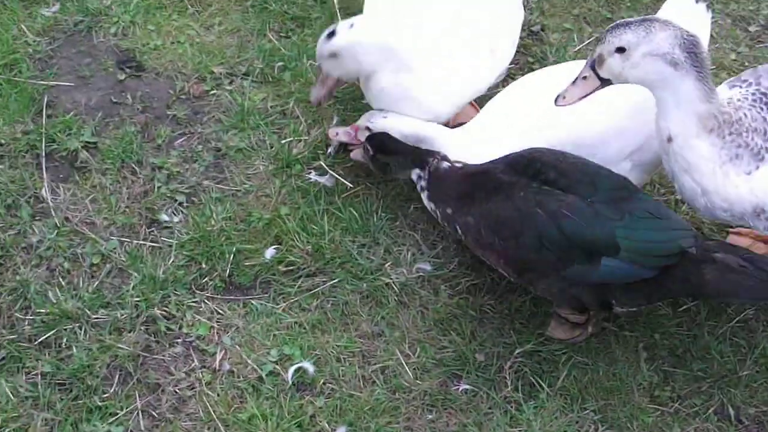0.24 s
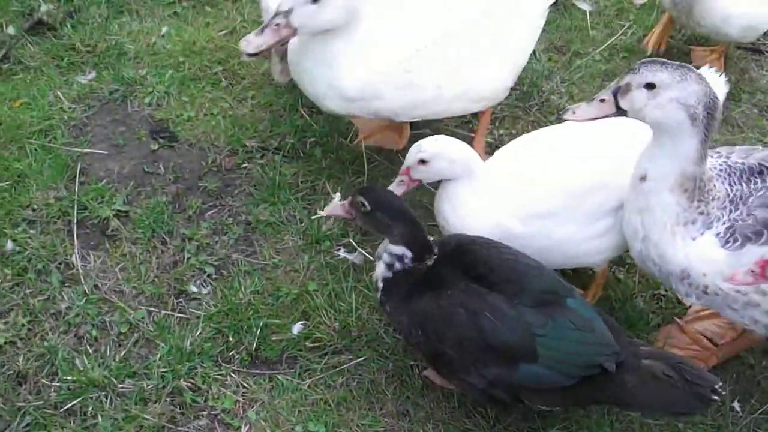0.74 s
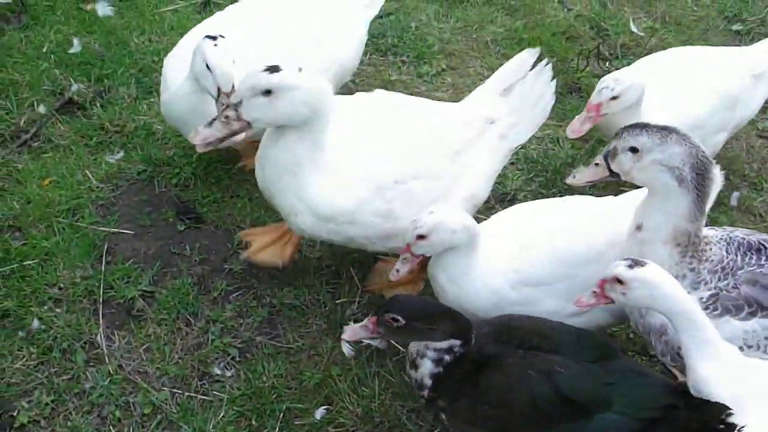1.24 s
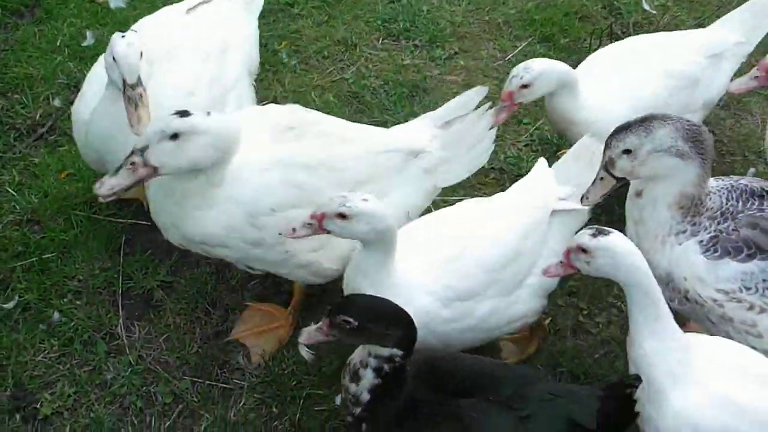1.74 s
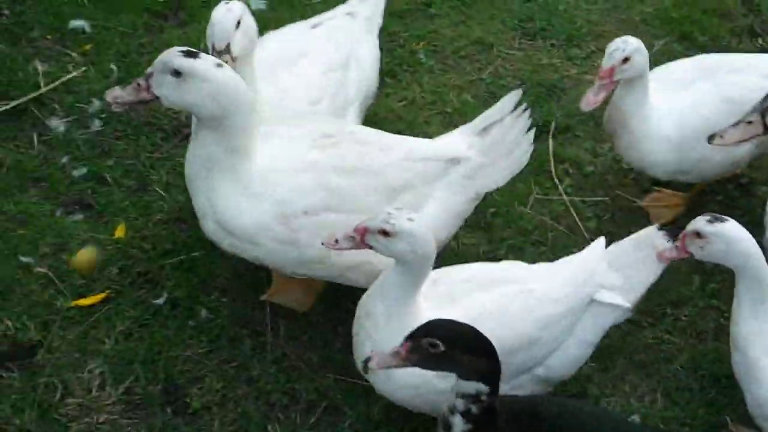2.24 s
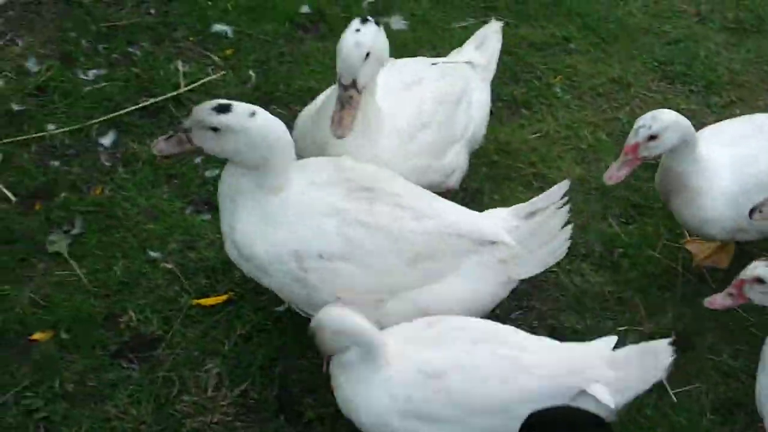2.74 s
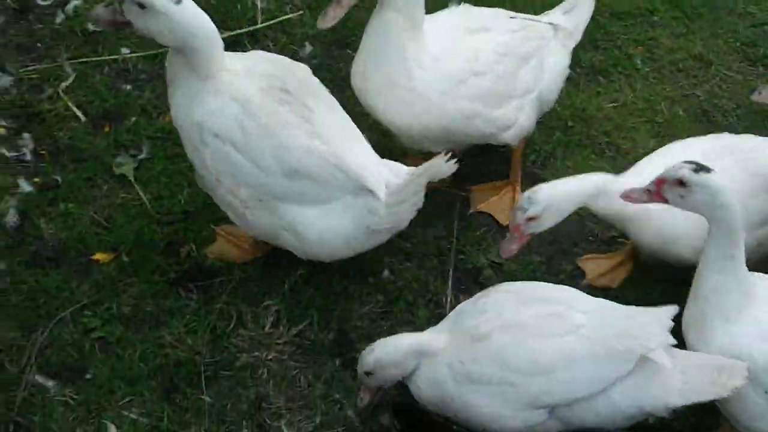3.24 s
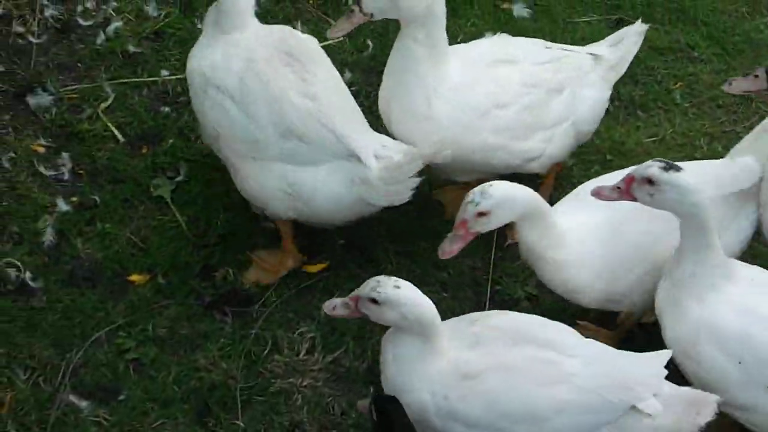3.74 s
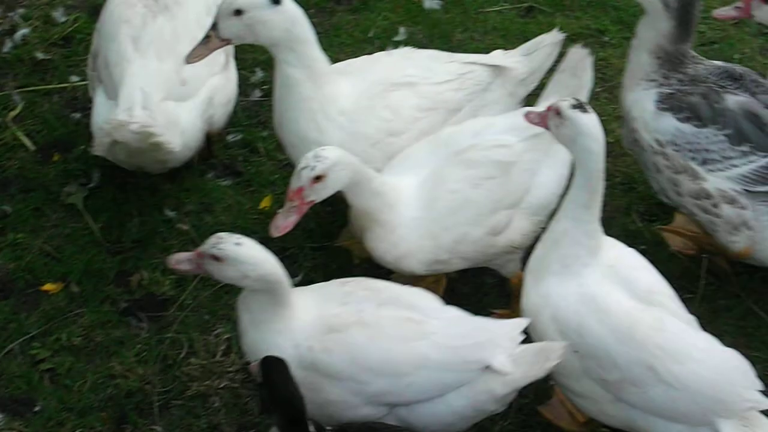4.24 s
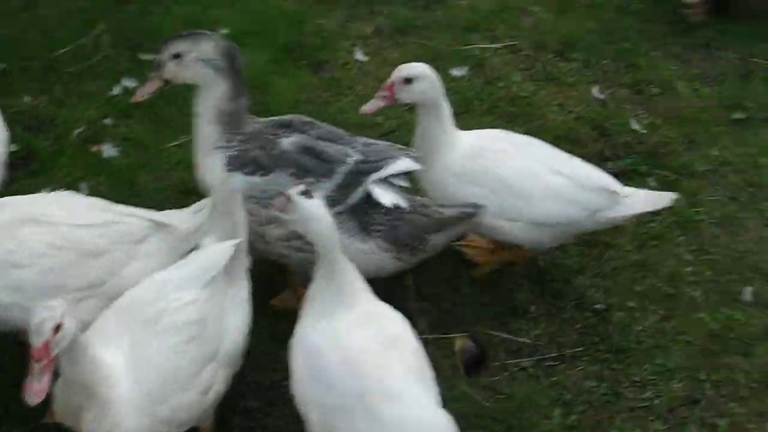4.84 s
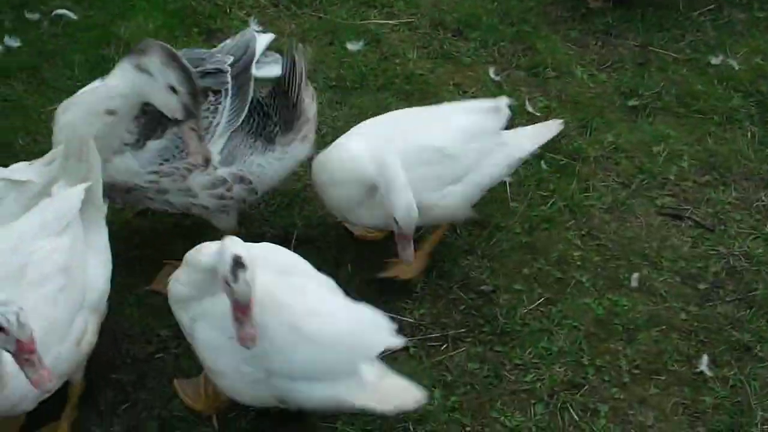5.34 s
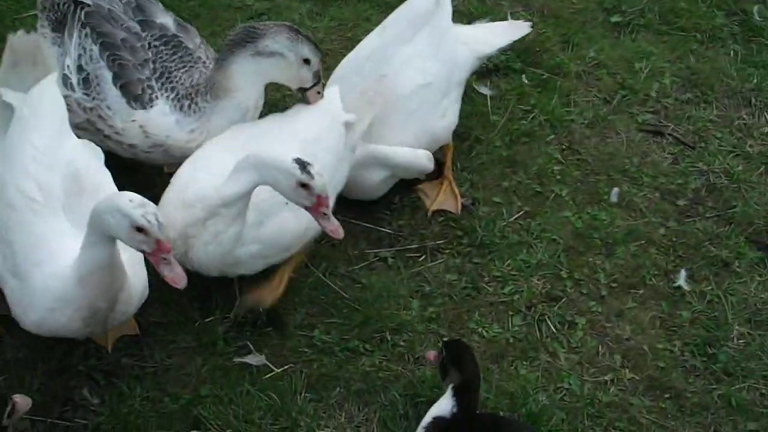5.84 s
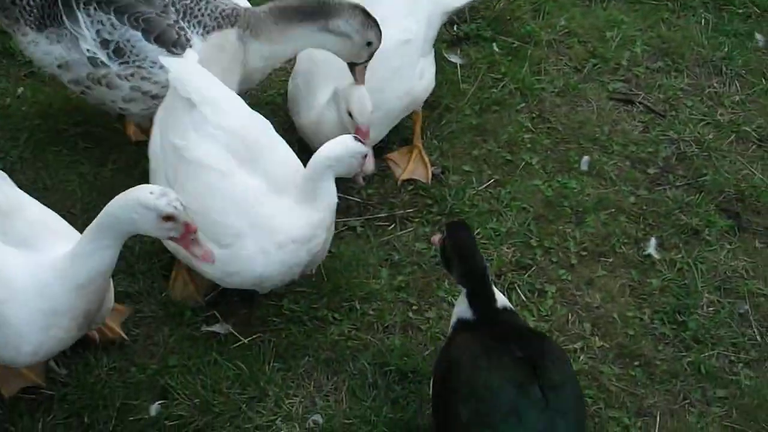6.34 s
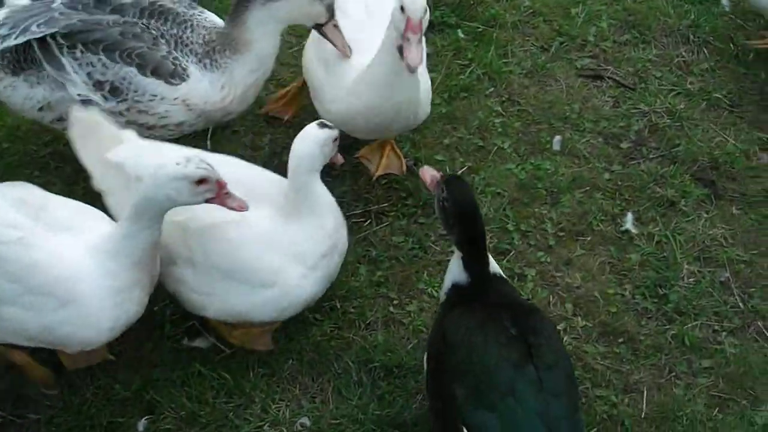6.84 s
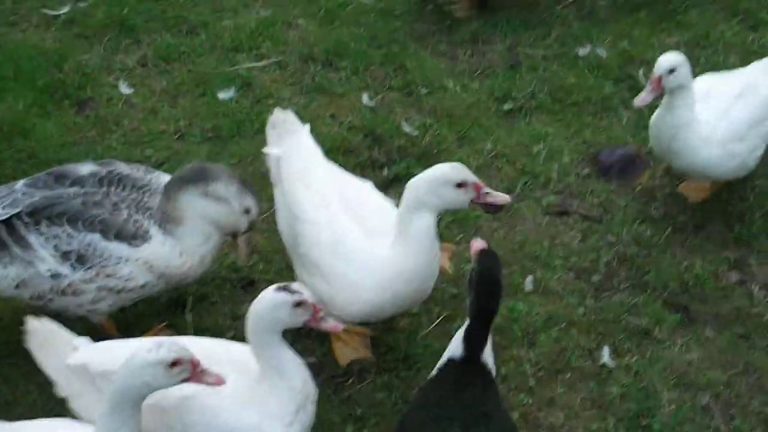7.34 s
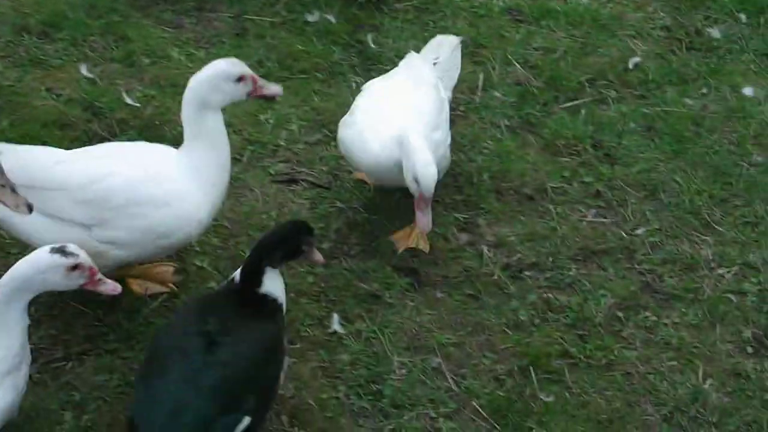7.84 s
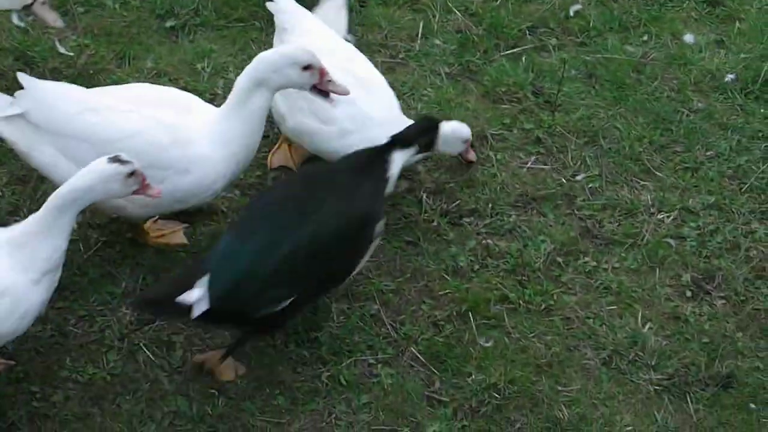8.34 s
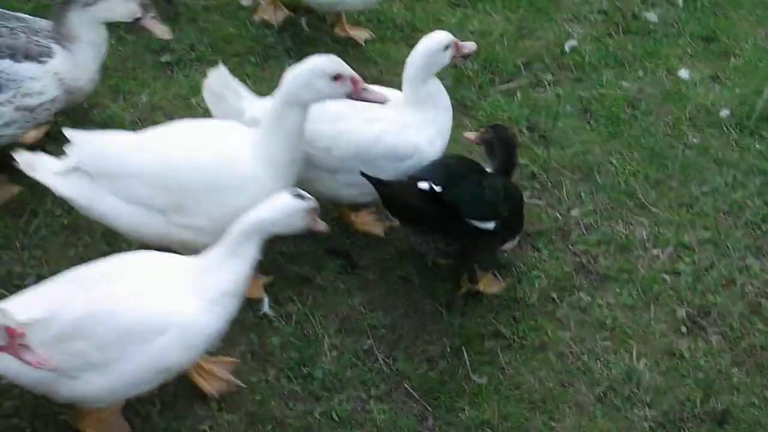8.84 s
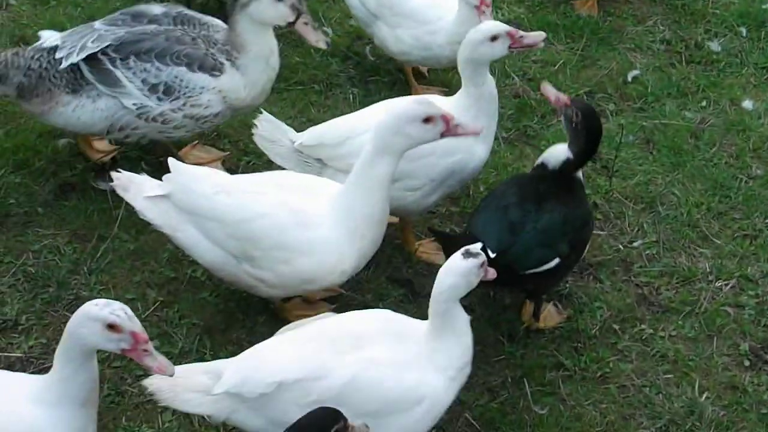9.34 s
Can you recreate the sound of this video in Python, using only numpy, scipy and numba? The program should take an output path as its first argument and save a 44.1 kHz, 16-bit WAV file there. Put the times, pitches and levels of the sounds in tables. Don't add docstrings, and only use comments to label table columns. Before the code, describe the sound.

Ducks feed very close to a handheld microphone on an open lawn, over low distant traffic, a wavering engine drone and a faint high insect hiss with short katydid scrapes about every 0.7 seconds. From 0 to 1 s come a chirp, bill snips, three clipped croaks and a clear peep. Rising chirps and dull pops follow, then peeps near 1.7 s and, at 1.95 s, a violent hard snap that clips and briefly ducks the sound. Between 2.4 and 3.1 s grunts, chirps and clicks crowd together. It is sparse until chirps and small croaks at 4.3-4.8 s; feathers rustle around 5.4 s with a soft long croak, and a peep lifts at 5.7 s. Quiet grunts come at 6.5 s, then ticks and small peeps. A lively cluster of snips, chirps and thin warbling runs 7.4-8.1 s, three rough croaks at 8.3-8.5 s, then faint peeps and clicks to about 9.5 s as the engine nearly disappears.

```python
import sys
import numpy as np
from scipy import signal
from scipy.fft import rfft, irfft, next_fast_len
from scipy.io import wavfile
from scipy.ndimage import uniform_filter1d
from numba import njit

SR = 44100
rng = np.random.default_rng(int(sys.argv[2]) if len(sys.argv) > 2 else 0)


def store_pcm(level_fs):
    pcm = np.round(np.clip(level_fs, -1, 1) * 32767).astype(np.int16)
    wavfile.write(sys.argv[1], SR, np.atleast_2d(pcm).T)


def convert_level_to_amplitude(level_db):
    exponent = np.asarray(level_db, float) / 20
    return 10 ** exponent


N = 422478

# start_s, traffic_db, rustle_db (feet and feathers)
YARD_LEVELS = [
    (0.0, -47.5, -56.5),
    (1.84, -49, -58.5),
    (4.96, -51, -59.5),
    (5.28, -50, -57),
    (5.4, -49.5, -53),
    (5.75, -50.5, -58),
    (7.12, -50.5, -59),
    (7.82, -49.5, -57.5),
    (8.94, -52, -59),
    (9.58, -50.5, -60),
]


def level(x, db):
    return x * convert_level_to_amplitude(db) / np.sqrt(np.mean(x ** 2))


def band(x, hz, width_hz):
    return signal.lfilter(*signal.iirpeak(hz, hz / width_hz, SR), x)


def add(out, s, x):
    i = int(s * SR)
    out[i:i + len(x)] += x[:N - i]


def walk(rate):
    k = int(SR / rate)
    steps = np.repeat(rng.standard_normal(N // k + 1), k)
    return 1.31 * uniform_filter1d(uniform_filter1d(steps, k), k)[:N]


def curve(table, column):
    return np.interp(np.arange(N) / SR, [r[0] for r in table], [r[column] for r in table])


def wash(spectrum, flicker_db, rate):
    hz, db = np.transpose(spectrum)
    size = next_fast_len(N, True)
    octave = np.log2(np.arange(1, size // 2 + 2) * SR / size)
    colour = rfft(rng.standard_normal(size)) * convert_level_to_amplitude(np.interp(octave, np.log2(hz), db, -99, -99))
    out = 0
    for k in np.arange(np.floor(2 * np.log2(hz[0])), 2 * np.log2(hz[-1]) + 1):
        piece = irfft(colour * np.clip(1 - abs(2 * octave - k), 0, 1), size)[:N]
        out = out + convert_level_to_amplitude(flicker_db * walk(rate)) * piece
    return level(out, 0)


def traffic():
    # freq_hz, density_db (per Hz)
    traffic_colour = [(18, -0.5), (25, -8), (36, -9), (100, -13), (200, -18.5), (340, -22.5), (560, -19),
                      (950, -20.5), (1150, -24), (1400, -32), (2200, -42.5), (2900, -47)]
    return convert_level_to_amplitude(curve(YARD_LEVELS, 1) + 4) * wash(traffic_colour, 2.0, 12)


def rustle():
    # freq_hz, density_db (per Hz)
    rustle_colour = [(1200, -12), (1600, -5), (2240, -7), (2900, 0.5), (3600, -4.5), (4700, -1),
                     (5600, -4.5), (7000, -3), (8500, -16), (11000, -23)]
    sizes = convert_level_to_amplitude(2.1 * np.minimum(rng.exponential(size=N), 2)) * rng.standard_normal(N)
    crackle = (rng.random(N) < 60 / SR) * sizes
    grass = wash(rustle_colour, 1.9, 20) + level(band(crackle, 11000, 14000), -10.0)
    return convert_level_to_amplitude(curve(YARD_LEVELS, 2) + 1.5) * grass


def haze():
    # freq_hz, density_db (per Hz)
    haze_colour = [(5500, -46), (7500, -8), (8800, -8.5), (9900, -3.5), (11200, 2.5), (12500, -4.5),
                   (14000, -10), (15000, -10), (15900, -14)]
    return convert_level_to_amplitude(-53 + 1.0 * walk(9)) * wash(haze_colour, .7, 20)


def engine():
    # start_s, firing_hz, level_db
    drone = [
        (0.0, 76.1, -49),
        (0.9, 75.5, -49),
        (1.25, 75, -41),
        (2.0, 72, -49.5),
        (2.7, 72, -43),
        (3.9, 69, -48.5),
        (5.0, 68.9, -48),
        (6.2, 65, -47.5),
        (7.6, 62.07, -54),
        (9.58, 61, -55),
    ]
    phase = 2 * np.pi * np.cumsum(curve(drone, 1) * (1 + 0.022 * walk(6))) / SR
    return np.sqrt(2) * convert_level_to_amplitude(curve(drone, 2) - 2.0 + 1.8 * walk(12)) * np.sin(phase)


def crickets():
    # wing_hz, strokes_per_s, open_share (0-1), bend_rad, unsteadiness, level_db
    singers = [(9524, 36.2, 1, 1.5, 0.0065, -62)]
    out, t = np.zeros(N), np.arange(N) / SR
    for hz, rate, share, bend, drift, db in singers:
        cycle = t * rate + drift * walk(2.0)
        stroke = np.sin(np.pi * np.clip(cycle % 1 / share, 0, 1))
        stroke_bend = bend * np.cos(2 * np.pi * (cycle - share / 2))
        note = np.sin(2 * np.pi * hz * t + stroke_bend + 8 * drift * walk(60) + .5 * walk(3.7))
        swell = convert_level_to_amplitude(5.3 * drift * walk(2.22) + .8 * walk(5))
        out += level(stroke * swell * note, db)
    return out


def hoarse_singers():
    # wing_hz, width_hz, bursts_per_s, level_db
    pair = [(7720, 260, 20.3, -68.5), (7620, 300, 21.4, -71.5)]
    out, t = np.zeros(N), np.arange(N) / SR
    for hz, width_hz, rate, db in pair:
        wing = band(band(rng.standard_normal(N), hz, width_hz), hz, width_hz)
        burst = np.clip(np.sin(2 * np.pi * (rate * t + .3 * walk(1.5))) + .2, 0, 1)
        out += level(burst * convert_level_to_amplitude(3.5 * walk(2.5)) * wing, db)
    return out


def strikes(rows, t60_s, width_share, gain_db):
    out, t = np.zeros(N), np.arange(int(0.038 * SR)) / SR
    for s, db, hz in rows:
        edge_db = -6 - .7 * (db + 39)
        noise = rng.standard_normal((2, len(t)))
        ring = band(noise[0] * np.exp(-np.log(1000) * t / t60_s), hz, width_share * hz)
        edge = np.diff(noise[1] * np.exp(-t / .0012), 2, append=[0, 0])
        strike = ring / abs(ring).max() + convert_level_to_amplitude(edge_db) * edge / abs(edge).max()
        add(out, s, convert_level_to_amplitude(db + gain_db) * strike)
    return out


def snips():
    # start_s, peak_db, ring_hz
    stalks = [(0.0924, -39, 9000), (0.5874, -35, 12500), (1.634, -41, 6590), (1.7868, -44, 10000),
              (2.1784, -39.5, 7810), (0.044, -45, 9000), (0.42, -41, 5500), (1.3134, -41, 12000),
              (2.1051, -43, 12000), (2.4778, -46, 12000), (4.563, -46, 13000), (4.742, -43, 5200),
              (4.885, -45, 4800), (6.866, -48, 12200), (6.888, -40, 12000), (7.0903, -40, 12000),
              (7.118, -44, 5500), (7.333, -47, 4500), (7.677, -37.5, 5500), (7.7104, -33, 5500),
              (2.581, -41, 3500), (2.589, -40, 5000), (7.885, -44, 5600), (8.45, -46, 12500),
              (8.3, -42, 5500), (4.0594, -45.5, 6160), (5.328, -44, 5000), (5.4999, -43, 5640),
              (6.4283, -43, 12500), (6.6634, -40.5, 12000), (6.734, -38, 4500), (7.262, -42, 7690),
              (7.1681, -42, 13000), (7.2946, -40, 6000), (7.818, -38, 12500), (8.531, -36, 9500),
              (9.2021, -39, 6040), (9.4968, -49.5, 6180)]
    return strikes(stalks, t60_s=0.011, width_share=.6, gain_db=4.8)


def chirps(flutter_hz=175, smooth_hz=950, wobble=0.075, chest_db=-10, bill_db=-4, tick_db=-24, arch=0.073):
    # start_s, length_s, peak_db, start_hz, end_hz
    rises = [(0.045, 0.02, -28, 630, 851.6), (1.004, 0.031, -29.5, 658.9, 814),
             (1.105, 0.041, -32.5, 694.9, 1153), (1.217, 0.022, -30, 692, 997.8),
             (1.464, 0.021, -29, 717, 785), (2.468, 0.03327, -33, 790, 940),
             (2.515, 0.013, -39.5, 910, 570), (2.583, 0.029, -30.5, 683, 1120),
             (4.431, 0.025, -31, 517, 967.7), (4.532, 0.026, -32.5, 587.4, 797),
             (4.645, 0.023, -39, 550, 800), (4.756, 0.024, -37, 540, 760), (5.808, 0.0338, -34, 464, 1094),
             (5.929, 0.021, -31.5, 446, 857), (7.671, 0.019, -25, 512, 1073),
             (7.779, 0.03681, -30.5, 560, 1180), (7.887, 0.039, -29, 620, 1197),
             (7.929, 0.027, -34, 963, 1110), (7.969, 0.01418, -43, 834, 1080)]
    # start_s, length_s, peak_db, pitch_hz
    peeps = [(0.751, 0.034, -25, 1059), (1.693, 0.034, -22.5, 1000), (1.663, 0.009, -32, 1020),
             (1.673, 0.008, -31, 1150), (1.681, 0.007, -31, 1170), (1.687, 0.007, -30, 1150),
             (9.475, 0.02, -42, 920), (9.44, 0.018, -44, 1250), (9.4, 0.03, -45, 600),
             (7.58, 0.014, -38, 950), (9.035, 0.014, -42, 700), (4.79, 0.04, -44, 560),
             (1.902, 0.0072, -36.5, 1060), (1.932, 0.022, -37, 850), (7.9, 0.02, -36, 1150),
             (4.461, 0.018, -39.5, 990), (6.189, 0.032, -39.5, 1000), (6.274, 0.012, -40, 882.3),
             (6.691, 0.023, -35, 1025), (6.81, 0.00729, -34, 950), (6.921, 0.024, -46, 1080),
             (7.259, 0.015, -35.5, 1060), (7.865, 0.025, -32.5, 934), (8.086, 0.011, -37, 902.8)]
    # start_s, length_s, peak_db, pitch_hz
    lifts = [(2.797, 0.018, -36.5, 790), (1.283, 0.024, -41, 1025), (9.515, 0.035, -43, 800),
             (7.385, 0.02, -45, 1000), (7.475, 0.02, -43, 850), (7.305, 0.015, -43, 850),
             (2.691, 0.014, -38, 840), (2.738, 0.024, -32.5, 957), (4.312, 0.038307, -35.5, 666),
             (5.693, 0.036, -26, 714.8), (6.222, 0.031, -36, 1005), (6.886, 0.015, -45, 1160),
             (7.171, 0.022, -44, 1052), (7.216, 0.021, -40, 987), (7.428, 0.018, -40, 900),
             (7.687, 0.024, -31, 945), (8.83, 0.017, -41.5, 950)]

    def sliding(rows, hz_per_s, peak):
        return [(s, d, db, hz - hz_per_s * d / 2, hz + hz_per_s * d / 2, peak) for s, d, db, hz in rows]

    notes = [(*row, 0.093) for row in rises] + sliding(peeps, -2100, 0.3058) + sliding(lifts, 6400, 0.43)
    out, knots = np.zeros(N), np.linspace(0, 1, 12)
    for s, length, db, start_hz, end_hz, peak in notes:
        u = np.linspace(0, 1, int(1.106 * length * SR))
        turn, slip = rng.random(2), rng.standard_normal((2, 12))
        glide = start_hz + (end_hz - start_hz) * u + arch * start_hz * (np.sin(np.pi * u) - .6)
        strain = np.clip(abs(end_hz - start_hz) / 150, .3, 1)
        hz = glide * (1 + strain * wobble * np.interp(u, knots, slip[0]))
        shape = np.sin(np.pi / 2 * np.interp(u, [0, np.clip(peak, .03, .9), 1], [0, 1, 0])) ** 1.15
        depth = np.clip((smooth_hz - glide) / 300, .45 * strain, .95)
        beat = 1.3 * length * flutter_hz * (.85 + 0.31 * turn[0]) * u
        pulse = np.sin(np.pi * (beat % 1) ** 0.82)
        phase = 2 * np.pi * (np.cumsum(hz) / SR + turn[1])
        slap = depth * np.exp(-(beat % 1) / 0.21)
        tick = band(band(slap * rng.standard_normal(len(u)), 4700, 700), 4600, 1400) / 0.12
        bill = convert_level_to_amplitude(bill_db) * slap * np.sin(1.55 * phase)
        wave = np.sin(phase) + bill + convert_level_to_amplitude(-33.5) * np.sin(3 * phase) + convert_level_to_amplitude(tick_db) * tick
        rough = 1 + .45 * strain * np.interp(u, knots, slip[1])
        chest = convert_level_to_amplitude(chest_db) * depth * np.sin(2 * np.pi * beat)
        add(out, s, convert_level_to_amplitude(db) * shape * ((1 - depth + depth * pulse) * rough * wave + chest))
    return out


def katydids(tooth_hz=290):
    # start_s, peak_db
    phrases = [(0.29, -47), (0.946, -49.5), (1.621, -48), (2.2598, -50.5), (2.952, -48.5), (3.5596, -54.5),
               (4.2547, -52.5), (5.1592, -52), (6.056, -46), (6.713, -44.5), (7.422, -43), (8.036, -44),
               (8.768, -45), (9.4078, -46)]
    # start_s, peak_db, length_s, wing_pitch_ratio
    neighbour = [
        (4.8, -51, 0.1, 1.12),
    ]
    # freq_hz, width_hz, gain_db
    wing_bands = [(6140, 240, 3.5), (6520, 330, 2.5), (7000, 280, -3.5)]
    out = np.zeros(N)
    for s, db, length, size in [*[(s, db, 0.15, 1) for s, db in phrases], *neighbour]:
        u = np.linspace(0, 1, int(length * SR))
        scrape = rng.standard_normal(len(u)) * np.exp(-(u * length * tooth_hz % 1) / .5)
        song = 0
        for hz, width_hz, gain_db in wing_bands:
            song = song + convert_level_to_amplitude(gain_db) * band(band(scrape, size * hz, width_hz), size * hz, 2 * width_hz)
        swell = np.sin(np.pi * u ** 0.9373) ** .5
        notch = 1 - 0.36 * np.exp(-((u - .5) / 0.08874) ** 2)
        add(out, s - .01, level(song, db - 4.5) * swell * notch)
    return out


def slides(rough_db=3.5, wobble=.014):
    # start_s, length_s, peak_db, start_hz, end_hz
    tones = [(0.311, 0.047, -53, 4350, 4950), (0.313, 0.025, -54, 2600, 3532),
             (2.003, 0.05, -51, 2849, 3809), (2.02, 0.037, -59, 4300, 4800),
             (3.045, 0.039, -54, 2700, 3850), (3.054, 0.02744, -48.5, 4200, 4755),
             (5.021, 0.05, -51.5, 2850, 4055), (5.026, 0.04, -53.5, 4373, 4858),
             (5.08, 0.035, -54.5, 4710, 4900), (5.342, 0.018, -52, 1350, 2300),
             (7.76, 0.022, -53, 2370, 2800), (7.782, 0.018, -52, 2100, 3000), (7.8, 0.04, -53, 2750, 2300),
             (8.098, 0.038, -57, 4500, 4400), (0.89, 0.09334, -60, 3150, 3277)]
    out = np.zeros(N)
    for s, length, db, start_hz, end_hz in tones:
        u = np.linspace(0, 1, int(length * SR))
        slip = [np.interp(u, np.linspace(0, 1, 12), row) for row in rng.standard_normal((2, 12))]
        glide = np.sin(np.pi / 2 * np.clip(1.15 * u ** 1.5, 0, 1)) ** 2
        pitch = (start_hz + (end_hz - start_hz) * glide) * (1 + wobble * slip[0])
        tone = np.sin(2 * np.pi * np.cumsum(pitch) / SR)
        add(out, s, convert_level_to_amplitude(db + 1.0 + rough_db * slip[1]) * np.sin(np.pi * u) ** 0.6 * tone)
    return out


def bill_clicks():
    # start_s, peak_db, ring_hz
    contacts = [(1.3208, -33.5, 2930), (1.5798, -43, 3010), (1.704, -33, 2900), (1.699, -32, 4300),
                (1.704, -36, 5600), (2.674, -42, 2750), (7.444, -42, 1600), (2.107, -41, 2900),
                (2.4822, -37, 4320), (2.588, -38, 2292), (4.3844, -42, 4680), (4.4497, -39, 4620),
                (4.54, -40.5, 4680), (4.625, -41, 4650), (3.2094, -42, 4800), (0.546, -44, 2600),
                (8.394, -47, 2900), (5.1693, -32, 1472), (5.545, -40.5, 2900), (7.091, -37, 4447),
                (7.559, -37, 1510), (7.643, -43.5, 3010), (7.676, -34, 2859), (7.7095, -31, 4915),
                (7.7754, -40, 2650), (8.6494, -45, 4480), (9.165, -40, 3000)]
    return strikes(contacts, t60_s=0.031, width_share=.13, gain_db=0)


def grunts(jitter=.03, bill_hz=1060, chest_db=-4, rebound=0.18, rebound_s=0.00328, top_hz=1600):
    # start_s, length_s, level_db, pulse_hz, throat_hz
    croaks = [(0.566, 0.043, -29, 106, 690), (0.669, 0.033, -27, 119, 630),
              (0.7603, 0.031, -27.5, 124.6, 600), (2.57, 0.031, -34.5, 96.8, 740),
              (2.716, 0.024, -37, 121.5, 654.1), (2.762, 0.036, -28, 116, 487),
              (2.888, 0.026, -29, 148.5, 584), (2.996, 0.021, -32, 180.6, 659.7),
              (3.089, 0.03423, -27, 131.5, 494), (4.421, 0.013, -32.5, 159.2, 630),
              (4.618, 0.019, -36.5, 143, 480.1), (5.377, 0.062, -36, 100.8, 704),
              (6.516, 0.024, -34.5, 165, 875.2), (6.634, 0.019, -31.5, 154.5, 861.1),
              (7.561, 0.034, -39, 155, 485.9), (8.324, 0.048, -30, 104, 680),
              (8.421, 0.035, -29.5, 138.3, 514), (8.531, 0.033, -26, 140.4, 880)]
    # start_s, level_db, throat_hz
    pops = [
        (0.548, -39.5, 870),
        (0.7143, -32, 560),
        (1.429, -30.5, 611.6),
        (1.655, -26.5, 579.3),
        (2.458, -37.5, 545),
        (2.676, -40, 525.8),
        (3.277, -45, 500),
        (5.168, -38.5, 590),
        (7.445, -41, 454.4),
    ]
    # start_s, rasp_db
    facing = [
        (0.57, 0),
        (0.77, -1),
        (2.77, -0.5),
        (3.0, -2),
        (3.1, 2),
        (4.5, -4),
        (5.4, -12),
        (6.6, -3),
        (8.33, -5.5),
        (8.53, -1),
    ]
    # freq_hz, width_hz, gain_db
    rasp_bands = [(1440, 170, -6), (2600, 820, 2.5), (4270, 380, 8.5), (4850, 570, 6.5), (9000, 5720, -14)]
    out = np.zeros(N)
    for s, length, db, rate_hz, throat_hz in [*croaks, *[(s, 0.0059, db, 217, hz) for s, db, hz in pops]]:
        lone_pulse = length < .009
        rasp_db = -15.5 - 0.1019 * (rate_hz - 125) + np.interp(s, *np.transpose(facing))
        chance = rng.standard_normal((12, 2))
        gaps = (1 + jitter * chance[1:, 0]) * .95 ** np.arange(-1, 10) / rate_hz
        times = np.cumsum(np.r_[0, gaps])
        on = times < max(length - .006, .001)
        pulses = np.zeros(int(.09 * SR))
        arc = np.sin(np.pi * (times[on] + 0.012) / (length + 0.014))
        pulses[(times[on] * SR).astype(int)] = convert_level_to_amplitude(2.2 * chance[on, 1]) * arc
        puffs = signal.lfilter([1], [1, -np.exp(-1 / (0.002 * SR))], pulses)
        air = puffs * rng.standard_normal((2, len(pulses)))
        flow = np.roll(pulses, 20) + rebound * np.roll(pulses, int(rebound_s * SR)) + 0.13 * air[0]
        flow = np.convolve(flow, np.hanning(int(.0007 * SR)))[:len(pulses)]
        t = np.arange(len(flow)) / SR
        shut_db = 192 * np.clip(t - length / 2, -.02, .02)
        bill = convert_level_to_amplitude(-9.5 - 5.5 * lone_pulse - shut_db) * band(flow, bill_hz, 180.0)
        bill = bill + convert_level_to_amplitude(-24.0 - shut_db) * band(flow, 1.43 * bill_hz, 220)
        low = convert_level_to_amplitude(-9.5 + shut_db) * band(flow, 150 + 0.42 * throat_hz, 124)
        voice = band(flow, throat_hz, 85) - bill - low
        voice = -signal.sosfilt(signal.butter(4, top_hz, fs=SR, output="sos"), voice)
        chest_hz = 90 + rate_hz / 2
        chest = convert_level_to_amplitude(.4 * shut_db) * band(band(pulses, chest_hz, 125), chest_hz, 125)
        leak = (air[1] + 3 * pulses) * np.clip(t / 0.01, .3, 1)
        rasp = 0
        for hz, width_hz, gain_db in rasp_bands:
            rasp = rasp + convert_level_to_amplitude(gain_db) * band(band(leak, hz, width_hz), hz, 2 * width_hz)
        short_db = db + 10 * np.log10((length + 0.0067) / 0.082) - 3
        croak = level(voice, short_db) + level(chest, short_db + chest_db - 6 * lone_pulse)
        add(out, s - .001, croak + level(rasp, short_db + rasp_db - 4))
    return out


def snap():
    # start_s, level_db, thump_db
    blows = [
        (1.9524, 0, -13),
        (1.9557, 2.5, 4.5),
        (1.9582, -1, 4),
        (1.9674, -17, -20),
    ]
    # freq_hz, gain_db, t60_s
    modes = [(560, -8, 0.041), (1110, -1.5, .018), (1540, -1.5, 0.015), (2046.5, -9.5, 0.015),
             (2650, -2.5, 0.017), (3585, -5, 0.012), (4320, -4.5, 0.012), (4710, 5, 0.011),
             (5500, -10, 0.015), (6240, -6.5, 0.014)]
    out, t = np.zeros(N), np.arange(int(.06 * SR)) / SR
    for s, db, thump_db in blows:
        turn, noise = rng.random(len(modes)), rng.standard_normal((2, len(t)))
        crack = convert_level_to_amplitude(-9.5) * noise[0] * np.exp(-t / 0.00075)
        x = crack + convert_level_to_amplitude(4.0) * band(band(noise[1], 3200, 3700), 3100, 3600) * np.exp(-t / 0.002)
        for (hz, gain_db, t60), p in zip(modes, turn):
            decay = np.exp(-np.log(1000) * t / t60)
            x = x + convert_level_to_amplitude(gain_db + thump_db * (hz < 2200)) * decay * np.sin(2 * np.pi * (hz * t + p))
        add(out, s, convert_level_to_amplitude(db - 6.0) * x * np.clip(t / 0.00044, 0, 1))
    return signal.sosfilt(signal.butter(2, 300, "high", fs=SR, output="sos"), out)


def warbles():
    # start_s, end_s, rest_hz
    spans = [
        (5.359, 5.41, 2370),
        (7.777, 8.037, 2390),
    ]
    # top_s (highest pitch), level_db (before the flick), reach_hz
    flicks = [
        (5.408, -46, 500),
        (7.795, -47, 700),
        (7.838, -52, 500),
        (7.886, -51, 650),
        (7.931, -50, 800),
        (7.974, -51, 700),
        (8.019, -46.5, 450),
    ]
    out = np.zeros(N)
    at, flick_db, reach_hz = np.transpose(flicks)
    for s, end, rest_hz in spans:
        t = np.arange(s, end, 1 / SR)
        slip = [np.interp(t, np.linspace(s, end, 60), row) for row in rng.standard_normal((2, 60))]
        flick = np.exp(-((t - at[:, None]) / .0062) ** 2)
        dip = np.exp(-((t - at[:, None] + 0.0177) / .007) ** 2).sum(0)
        pitch = (rest_hz + reach_hz @ flick - 160 * dip) * (1 + 0.011 * slip[0])
        db = np.interp(t, at - .015, flick_db) - 6 * np.roll(flick.sum(0), 100) + 3.5 * slip[1]
        tone = np.sin(2 * np.pi * np.cumsum(pitch) / SR)
        add(out, s, convert_level_to_amplitude(db) * signal.windows.tukey(len(t), .15) * tone)
    return out


def scene():
    birds = snips() + chirps() + slides() + bill_clicks() + grunts() + snap() + warbles()
    t = np.arange(int(.12 * SR)) / SR
    fence = convert_level_to_amplitude(-41) * rng.standard_normal(len(t)) * np.exp(-t / 0.0067) * (t > .004)
    fence = band(band(fence, 730, 900), 730, 900)
    echo = signal.fftconvolve(birds, fence)[:N]
    insects = haze() + crickets() + hoarse_singers() + katydids()
    return (birds + echo + insects + engine() + traffic() + rustle())[None]


@njit
def follow(x, release):
    y, e = np.empty(len(x)), 0.
    for i in range(len(x)):
        e = max(abs(x[i]), e * release)
        y[i] = e
    return y


def roll_off(x):
    return signal.sosfilt(signal.butter(12, 15920, fs=SR, output="sos"), x)


def record(dry):
    peak = follow(dry[0], np.exp(-1 / (.07 * SR)))
    gain = np.minimum(1, (.4 / (peak + 1e-9)) ** .48)
    lag = int(0.0046 * SR)
    gain = uniform_filter1d(np.r_[np.ones(lag), gain[:-lag]], 200)
    return roll_off(np.clip(dry * gain, -1, 1))


dry = scene()
out = record(dry)
store_pcm(out)
```